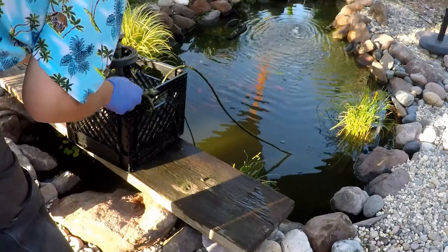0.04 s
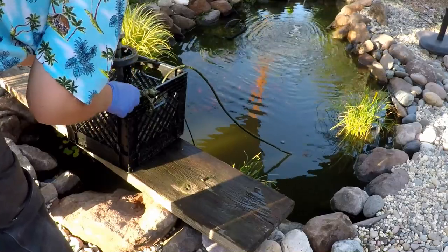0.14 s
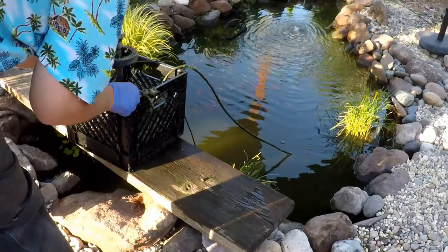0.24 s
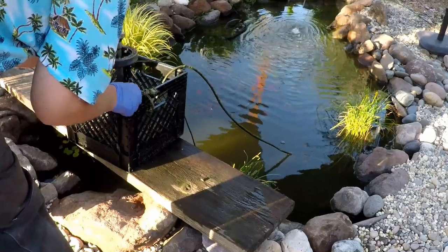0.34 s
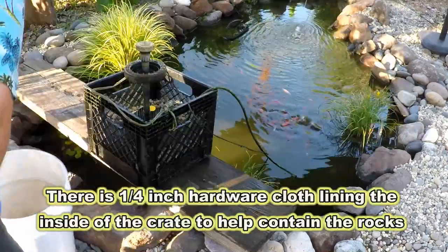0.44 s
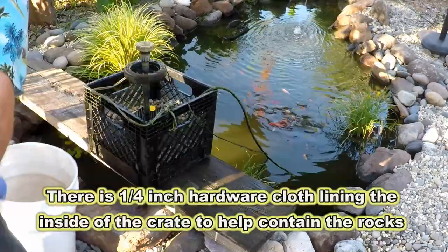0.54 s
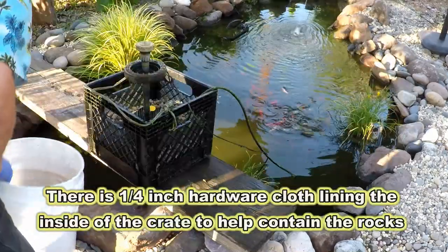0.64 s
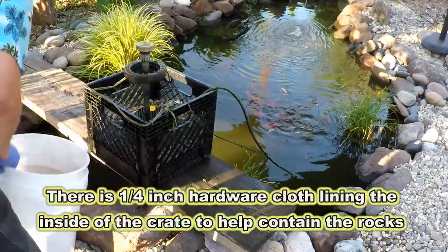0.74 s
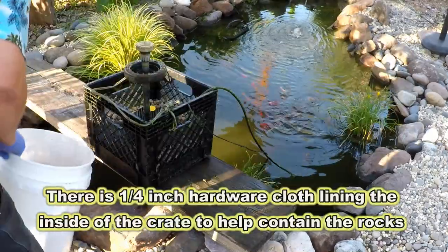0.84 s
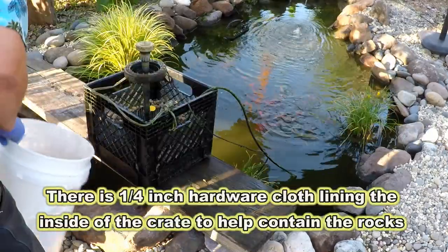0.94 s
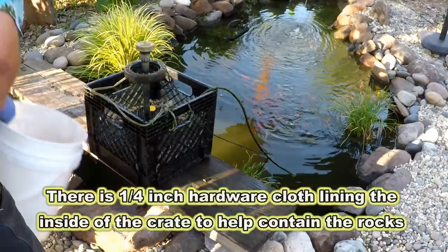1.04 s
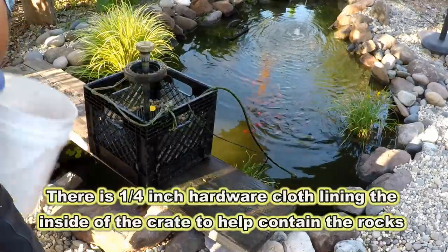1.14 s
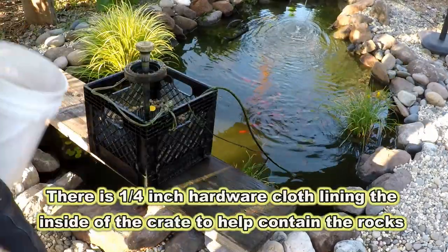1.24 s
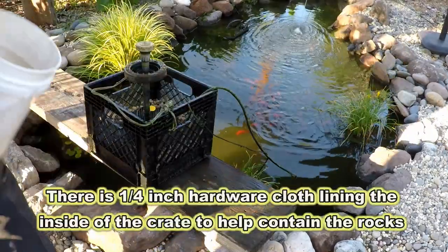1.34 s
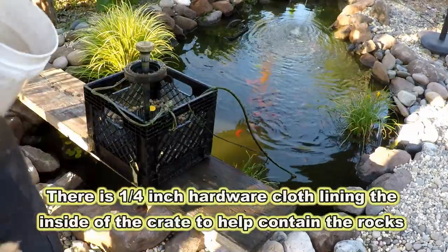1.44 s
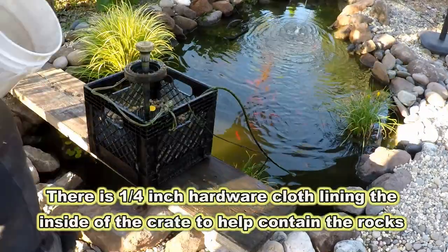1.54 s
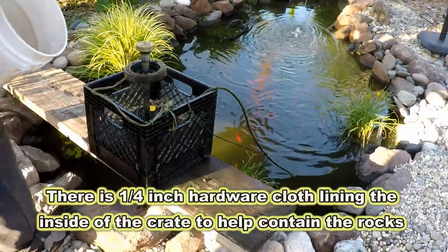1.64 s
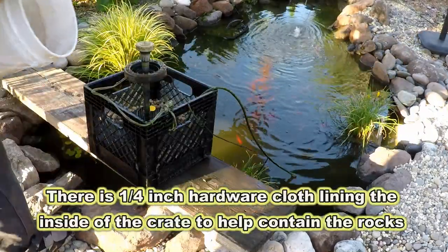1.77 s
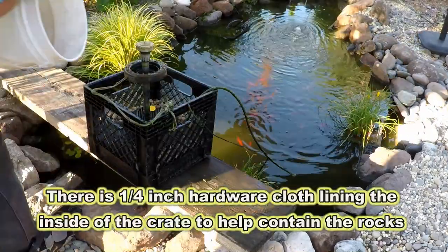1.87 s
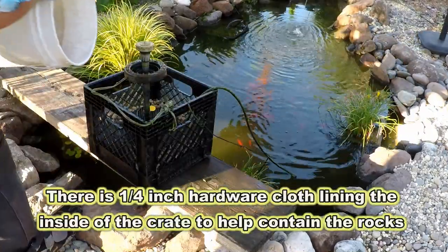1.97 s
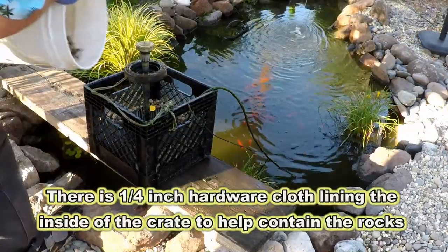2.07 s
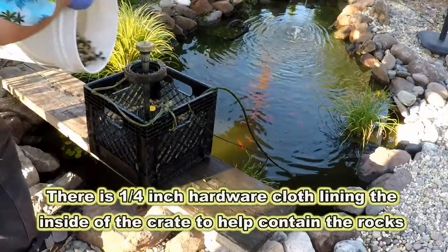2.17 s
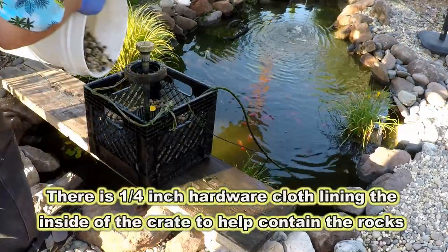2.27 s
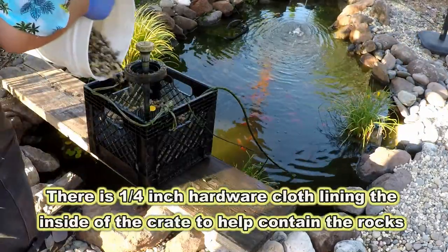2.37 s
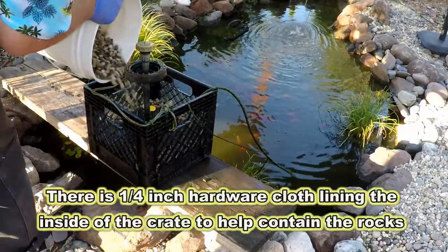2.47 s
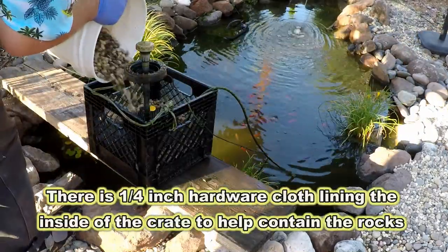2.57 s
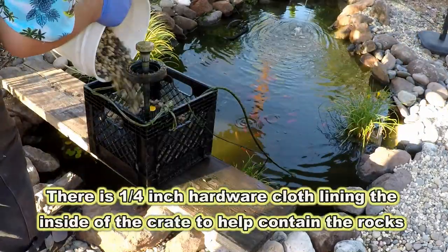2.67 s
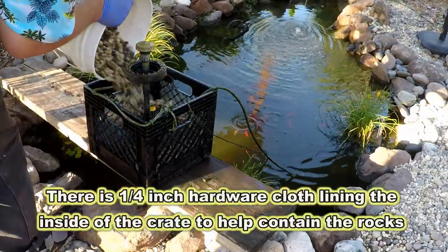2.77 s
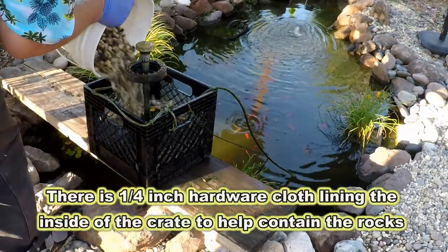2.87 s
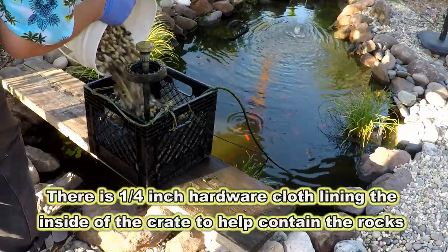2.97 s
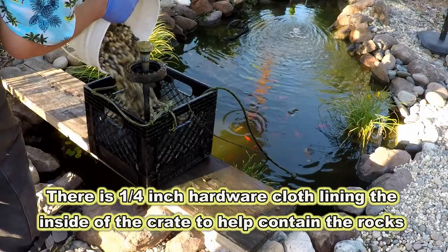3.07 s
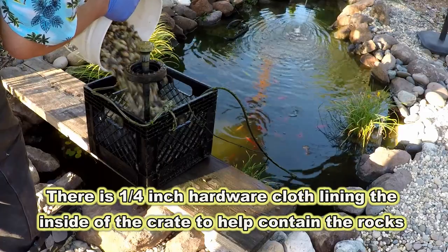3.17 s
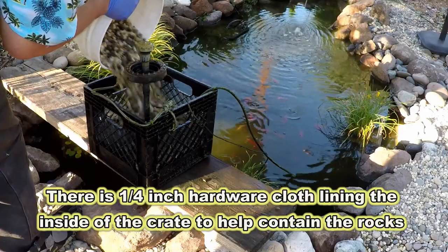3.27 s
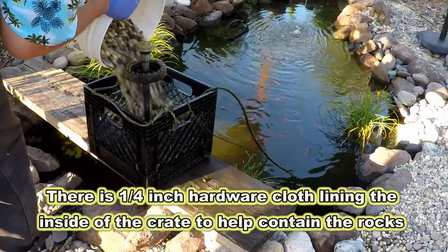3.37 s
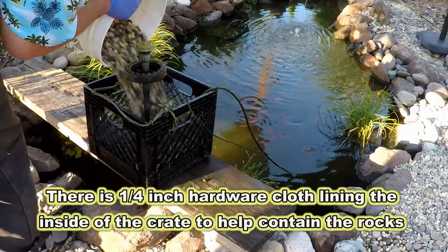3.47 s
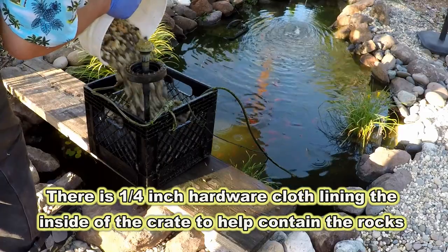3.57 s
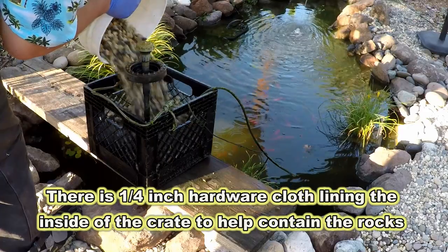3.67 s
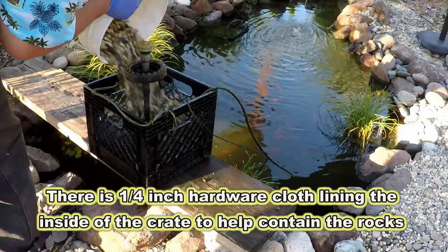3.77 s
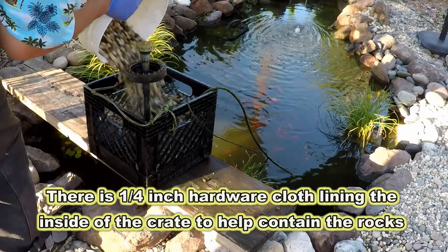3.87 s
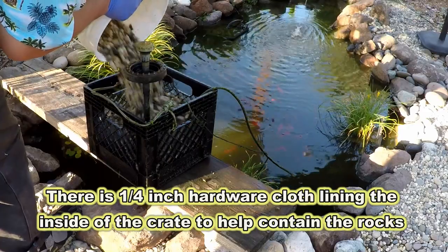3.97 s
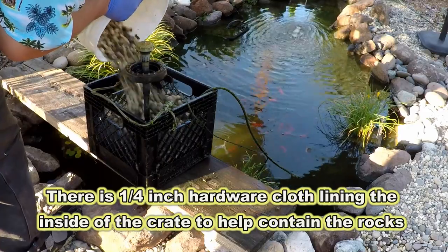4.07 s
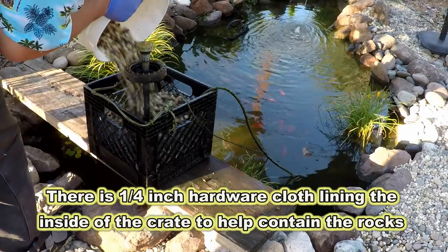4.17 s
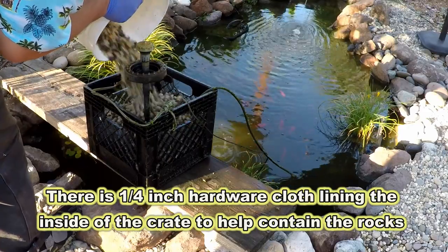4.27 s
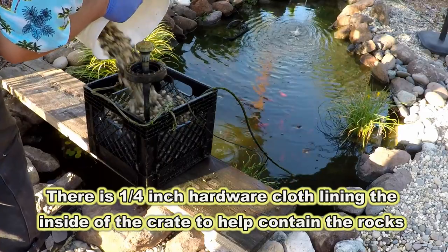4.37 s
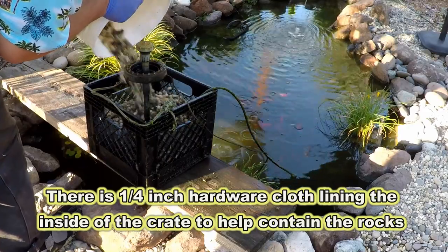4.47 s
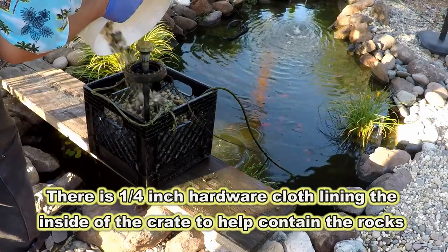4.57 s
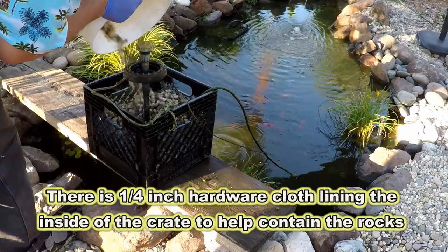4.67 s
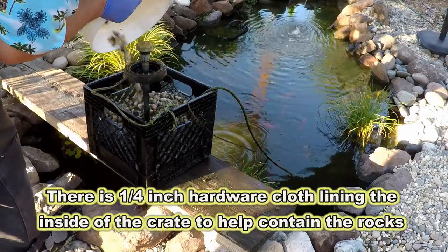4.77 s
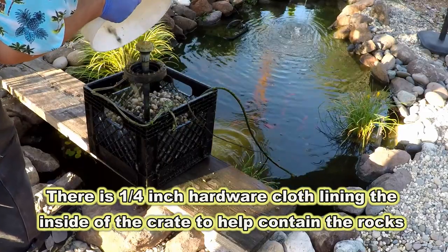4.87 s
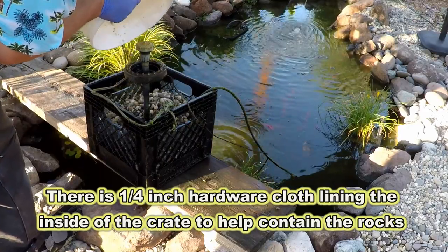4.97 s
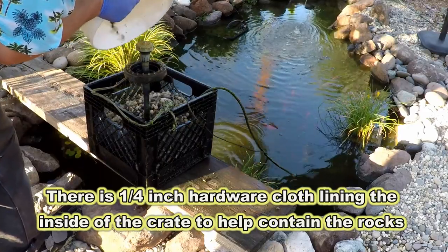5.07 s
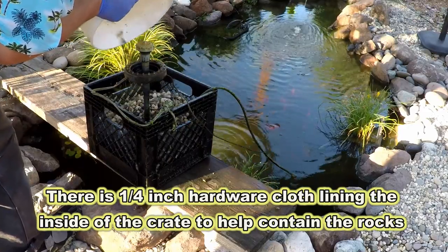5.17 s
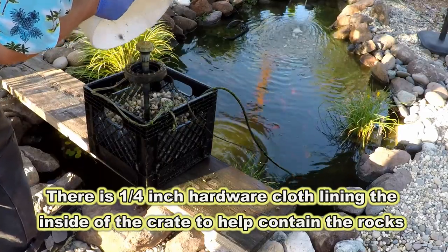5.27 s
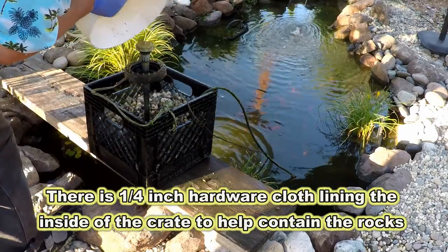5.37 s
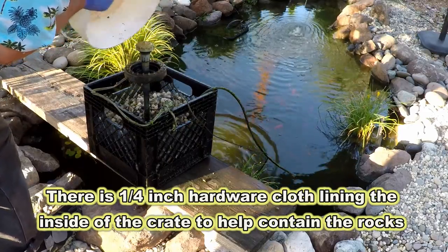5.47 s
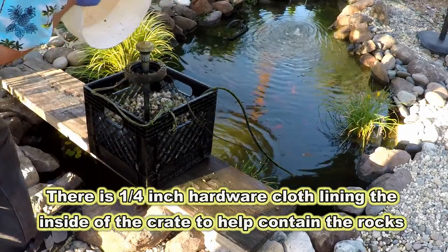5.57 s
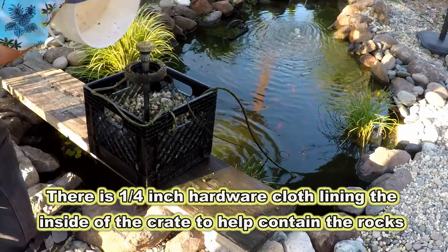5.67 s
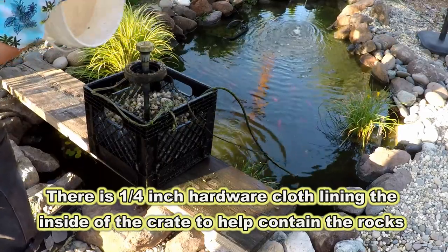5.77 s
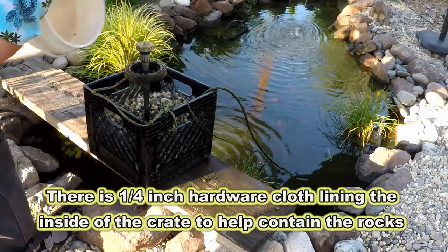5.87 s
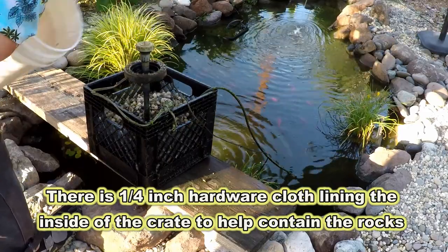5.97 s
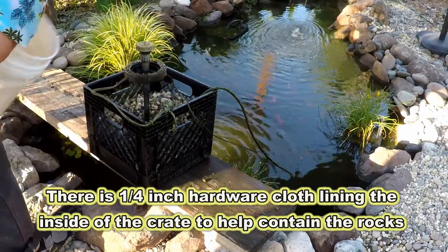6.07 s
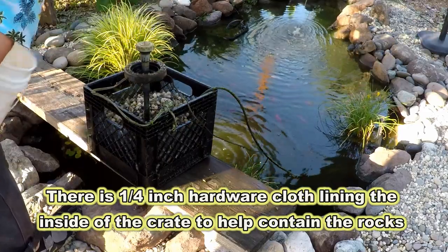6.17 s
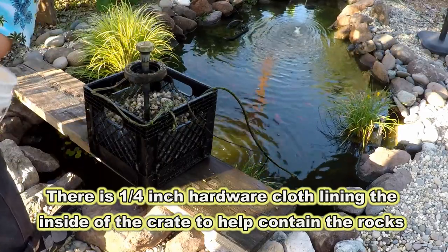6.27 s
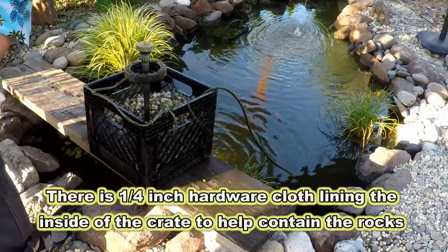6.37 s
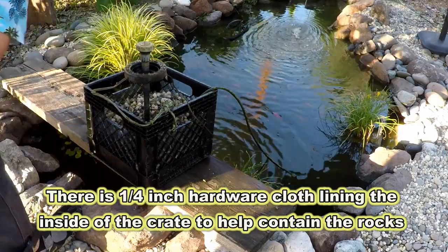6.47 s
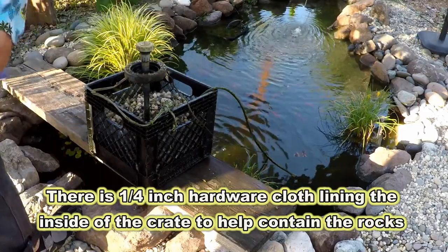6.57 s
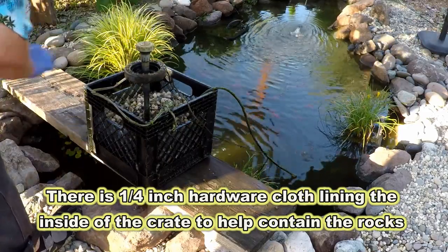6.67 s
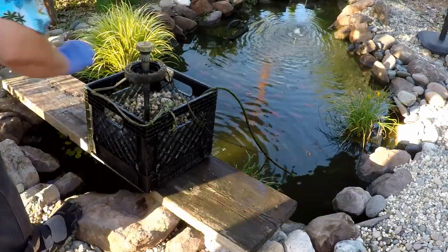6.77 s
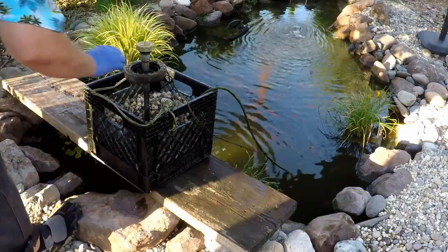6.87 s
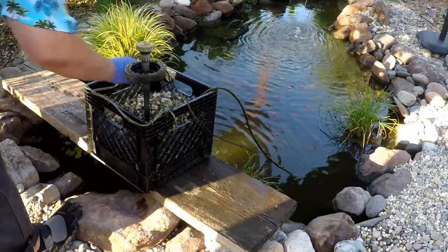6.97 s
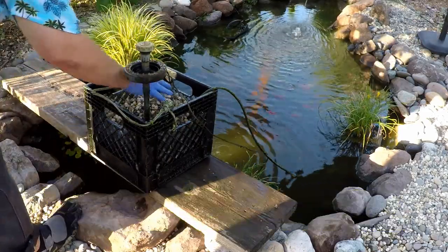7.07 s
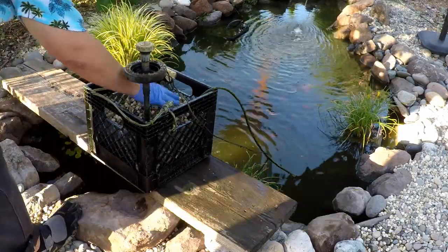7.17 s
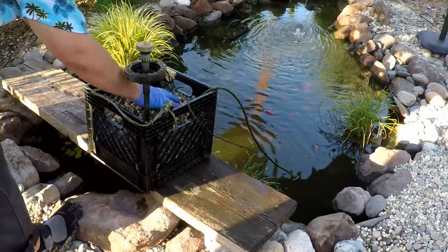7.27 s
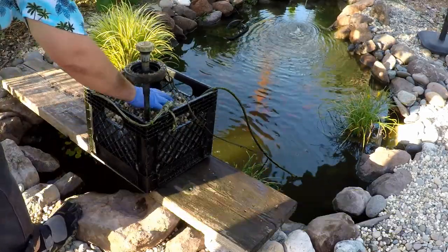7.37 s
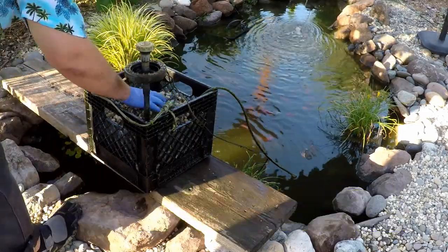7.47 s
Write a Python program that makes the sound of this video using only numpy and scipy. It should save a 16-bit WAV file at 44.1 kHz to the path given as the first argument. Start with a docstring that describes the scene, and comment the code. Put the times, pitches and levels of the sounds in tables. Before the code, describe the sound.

Outdoors at a garden pond, close and dry, nearly mono. For the first half second a gust rumbles low over soft hiss, with small watery bubbles and drips; then the air calms. Faint stone ticks lead to a sharp hollow knock at 0.8 s as gravel shifts in a plastic bucket, with smaller clacks until 1.45 s and more from 1.7 s. At about 2.0 s the load slides down the bucket wall in a loud, hollow rush, dips around 2.6 s with separate knocks, then pours into a crate: dense, bright rattling with clear stone clacks and crisp clicks, strong from 3 to 4.5 s. It thins from 4.6 s to scattered stones, nearly gone by 5.7 s. A hollow plastic bump lands at 6.3 s, a lighter one at 6.9 s, with small drips between. Soft, low wooden knocks sound from 7.0 to 7.4 s over quiet air.

```python
"""Gravel shifts in a plastic bucket, slides down its wall and pours into a crate beside a garden pond:
clouds of random impacts, rattling as noise, are coloured by bucket, crate and stone. Larger stones clack
as short sines and single stones knock as noise bursts; the bucket and, at the end, a wooden plank ring
in damped modes. A light wind rumbles as lumpy noise over a soft hiss; the pond bubbles in tiny sines.
The two channels are nearly alike."""
import sys
import numpy as np
from scipy import signal
from scipy.fft import rfft, irfft, next_fast_len
from scipy.io import wavfile
from scipy.ndimage import uniform_filter1d, map_coordinates

SR = 44100
rng = np.random.default_rng(int(sys.argv[2]) if len(sys.argv) > 2 else 0)


def linear_from_db(decibels):
    """Turn decibels (scalar or array-like) into linear amplitude factors; 0 gives 1."""
    return 10 ** (np.asarray(decibels, float) / 20)


def transcribe(u):
    """Save the signal u as a 16-bit wav file named by the first command-line argument.

    u: samples, shape (n,) or (channels, n), limited to [-1, 1]; the rate is SR.
    q: integer samples, one column per channel.
    """
    v = np.clip(np.atleast_2d(u).T, -1, 1)
    q = np.round(v * 32767).astype(np.int16)
    wavfile.write(sys.argv[1], SR, q)


N = 332073

# The moving gravel: (time [s], clatter [dB], hollow knocking over clatter [dB],
# stone-on-stone clicks over clatter [dB])
GRAVEL_FLOW = [(0, -62.5, -1, -6), (.65, -61, 1.5, -10.5), (1.0, -58.5, 2, -12.5), (1.7, -60, -5, -9),
               (1.8, -48, -5, -8.5), (1.96, -45.5, -1, -9.5), (1.99, -28, 0.5, -18), (2.1, -30, -1.5, -13),
               (2.44, -37, -0.5, -10), (2.64, -40.5, 4, -8.5), (2.8, -38.5, 4, -4.5), (3.05, -34, 2.5, -4),
               (3.6, -33.5, 1.5, 0), (4.21, -32, -2.5, -2.5), (4.5, -34.5, -2.5, -0.5),
               (4.75, -38.5, -3, -1), (4.95, -43, 0.5, -0.5), (5.1, -46.5, -2.5, 1),
               (5.25, -53.5, -0.5, -0.5), (5.55, -61, 5, 2), (5.72, -66, 1.5, -0.5), (6.1, -70, -6, -8),
               (6.5, -61.5, -0.5, -12.5), (6.75, -69.5, -3, -6.5), (7.05, -69, 7, -12),
               (7.35, -68.5, 0, -5.5), (7.53, -49, -8, -6.5)]
# How the sound passes from bucket to crate: (time [s], share given to the crate [0-1])
CRATE_SHARE = [(0, 0.07), (2.45, 0), (2.75, 0.84), (4.6, 0.8), (5.2, 0.4), (7.53, 0.13)]
# Stones on mesh and heap: (frequency [Hz], relative density [dB per Hz])
CRATE_CLATTER = [(1350, -29.5), (2300, -11.5), (3390, 2.5), (4340, 1), (6790, -8.5), (8500, -24.5),
                 (11000, -39), (18700, -120)]
# Low knocking in the crate: (frequency [Hz], relative density [dB per Hz])
CRATE_HOLLOW = [(350, -39), (600, -21), (727, -13), (927, -6), (1080, -13), (1420, -3), (1900, -1),
                (2400, -0.5), (3120, -5), (5280, -120)]
# Drumming in the crate: (frequency [Hz], relative density [dB per Hz])
CRATE_DRUM = [(88, -41), (150, -27), (231, -5.5), (446, -0.5), (517, 1), (700, 0), (910, -22), (1540, -120)]
# The loaded bucket, drumming lower: (frequency [Hz], relative density [dB per Hz])
BUCKET_DRUM = [(88, -36), (150, -13), (215, 0), (330, -6), (517, -3.5), (700, -2), (910, -20), (1540, -120)]
# Bucket wall and cavity, lower ridge: (frequency [Hz], relative density [dB per Hz])
WALL_LOW = [(350, -39.5), (600, -4), (722, -11.5), (901, -2), (1080, -2), (1280, 1), (1480, 3), (1820, 0),
            (2010, -0.5), (2400, -6.5), (3120, -38), (5280, -120)]
# Bucket wall, upper ridge: (frequency [Hz], relative density [dB per Hz])
WALL_HIGH = [(1350, -38.5), (2300, -5), (2680, -3.5), (3110, 0.5), (3910, -9), (7020, -19), (8500, -26),
             (11000, -44), (18700, -120)]
# Stone clicking on stone: (frequency [Hz], relative density [dB per Hz])
STONE_CLICKS = [(4120, -36.5), (7000, -7), (8480, -14.5), (10500, -2), (11700, -1.5), (13200, -4),
                (14700, -10), (15400, -12.5)]
# Large stones that ring clearly: (time [s], level [dB], frequency [Hz])
RINGING_STONES = [(2.829, -14, 1460), (3.003, -16, 1500), (3.152, -15, 1440), (4.539, -23, 1000),
                  (4.54, -18, 2020)]

# Wind at the microphone: (time [s], rumble level [dB])
WIND_LEVEL = [(0, -46.5), (.42, -44), (.52, -54), (4.3, -54.5), (6, -55.5), (7.53, -54.5)]
# Colour of the wind: (frequency [Hz], relative density [dB per Hz])
WIND_RUMBLE = [(12, -32), (20, -2.5), (65, -2), (97, -6), (152, -15), (184, -26), (250, -21), (320, -27),
               (550, -120)]
# Colour of the distant garden hiss: (frequency [Hz], relative density [dB per Hz])
GARDEN_HISS = [(88, -38), (150, 1.5), (582, -2.5), (1170, -7), (2050, -54), (3330, -22.5), (4460, -19.5),
               (4910, -14), (8780, -29), (12900, -37), (15400, -40)]
# Faint bubbling of the pond: (time [s], level [dB])
POND_LEVEL = [(0, -55), (.45, -74), (.55, -75), (5.6, -66.5), (7.53, -71.5)]
# Nearer drips: (time [s], level [dB], frequency [Hz])
NEAR_DRIPS = [(0.0185, -37, 2290), (0.0608, -37.5, 3480), (0.0982, -43, 2180), (0.288, -38, 2970),
              (0.3735, -40.5, 3620), (0.7088, -52, 3450), (5.8366, -53, 1550), (6.183, -56, 2510),
              (6.1994, -45, 3210), (6.268, -45, 3220), (6.6184, -41, 3560), (7.1777, -45, 1760),
              (7.228, -42.5, 1670)]

# Single stones and small handfuls landing:
# (time [s], level [dB], hollowness [dB], nominal 60 dB decay [s])
STONE_KNOCKS = [(0.236, -36.5, -4.5, 0.071), (0.409, -39, -1.5, 0.14), (0.465, -39.5, 6.5, 0.055),
                (0.505, -37, 0, 0.068), (0.561, -39.5, 2.5, 0.065), (0.619, -36.5, -3, 0.063),
                (0.655, -34, -7.5, 0.016), (0.754, -28, 3, 0.031), (0.793, -17, 2.5, 0.036),
                (0.799, -8, 1.5, 0.027), (0.82, -24.5, 2, 0.07), (0.863, -37.5, 6, 0.057),
                (0.935, -21, 2, 0.036), (0.953, -25.5, 1.5, 0.031), (0.989, -23, 6.5, 0.019),
                (1.032, -34, 4, 0.045), (1.074, -24, 0.5, 0.025), (1.155, -34, 3, 0.028),
                (1.166, -30.5, -4, 0.032), (1.175, -31, 2.5, 0.058), (1.196, -39, -5, 0.031),
                (1.249, -48, 8, 0.036), (1.366, -31.5, 4.5, 0.045), (1.38, -30, 6, 0.035),
                (1.39, -33.5, 0, 0.031), (1.429, -21.5, 2.5, 0.022), (1.517, -37, 1, 0.038),
                (1.721, -16.5, 0.5, 0.026), (1.774, -31.5, 1, 0.068), (1.79, -23.5, -1, 0.082),
                (1.853, -15.5, 2.5, 0.02), (1.872, -23, 5, 0.018), (1.9, -18, 1, 0.035),
                (1.932, -20.5, 0.5, 0.061), (1.956, -22, 3.5, 0.045), (1.983, -21, -4, 0.025),
                (2.52, -17, 2, 0.045), (2.545, -16, -2, 0.035), (2.552, -28, 0, 0.029),
                (2.565, -17.5, 1.5, 0.031), (2.598, -27, -4, 0.039), (2.627, -24, 0, 0.025),
                (2.647, -15, -0.5, 0.059), (2.679, -18.5, 1, 0.049), (2.721, -17.5, 2.5, 0.069),
                (2.754, -16.5, 1.5, 0.053), (2.823, -18.5, 0, 0.029), (2.829, -14.5, 0.5, 0.042),
                (2.853, -19, 0, 0.038), (2.884, -14.5, 2, 0.054), (2.944, -20, 0, 0.037),
                (3.0, -18.5, 0, 0.04), (4.539, -16.5, 4, 0.015), (4.86, -27, -8, 0.03),
                (4.935, -27, -4, 0.038), (4.99, -36, -3, 0.045), (5.048, -29, -5.5, 0.043),
                (5.113, -29.5, 3, 0.033), (5.166, -29, 0, 0.14), (5.198, -27.5, 0, 0.094),
                (5.246, -30, -0.5, 0.052), (5.282, -32, 3, 0.067), (5.29, -26, -1, 0.06),
                (5.336, -31.5, 3.5, 0.045), (5.369, -31, -5, 0.04), (5.403, -34, -2.5, 0.071),
                (5.439, -25.5, -3.5, 0.022), (5.454, -35, -5, 0.048), (5.475, -23.5, -0.5, 0.061),
                (5.494, -26.5, 2, 0.14), (5.537, -39, -3, 0.036), (5.591, -34.5, -1, 0.063),
                (5.614, -31, 3.5, 0.057), (5.734, -46, -3.5, 0.05), (5.918, -44.5, -3, 0.06),
                (5.952, -36, 0.5, 0.028)]
# Bumps and scuffs of the empty bucket and the plank:
# (time [s], level [dB], hollowness [dB], nominal 60 dB decay [s])
BUMPS = [(6.324, -17, 0, 0.061), (6.344, -22, 3, 0.078), (6.407, -47, -2, 0.045),
         (6.467, -39.5, -2.5, 0.092), (6.533, -41.5, 4, 0.04), (6.668, -45, 6, 0.036),
         (6.734, -36, 2.5, 0.069), (6.889, -28.5, 2.5, 0.062), (6.958, -34.5, 3.5, 0.14),
         (7.046, -37.5, 2.5, 0.058), (7.062, -39.5, 8.5, 0.042), (7.177, -47.5, 13, 0.05),
         (7.254, -49, 6, 0.05), (7.291, -50.5, 9, 0.06), (7.333, -45, 2.5, 0.082)]
# Parts of a stone knock over its level: (drumming [dB], hollow [dB], clatter [dB], click [dB])
STONE_PARTS = [-36, -15, -15.5, -22]
# Parts of a bump over its level: (drumming [dB], hollow [dB], clatter [dB], click [dB])
BUMP_PARTS = [-22.5, -14.5, -15.5, -22.5]
# The emptying bucket is struck by its last stones, then touches the ground: (time [s], level [dB])
BUCKET_TOUCHES = [(4.62, -42.5), (4.801, -51), (5.01, -49), (5.04, -48.5), (5.335, -48.5), (6.325, -33),
                  (6.397, -63), (6.534, -54), (6.597, -61), (6.736, -52), (6.891, -41.5)]
# Modes of the bucket: (frequency [Hz], level over the touch [dB], 60 dB decay [s])
BUCKET_MODES = [(484, 1.5, .12), (803, -7.5, 0.16), (1050, 2, 0.08), (1350, -2, 0.084), (2180, -14, .04)]
# Blows on the plank: (time [s], level [dB], lowest mode [Hz], hardness [dB gained per octave])
PLANK_BLOWS = [(6.976, -25.5, 174.6, -0.5), (7.027, -30, 200.5, -7), (7.196, -41, 219, -6),
               (7.254, -27, 187.7, -0.5), (7.289, -35.5, 172, 2), (7.32, -33.5, 206, -8),
               (7.376, -40, 204, -16)]
# Modes of the plank: (multiple of lowest mode, level over the blow [dB], 60 dB decay [s])
PLANK_MODES = [(1, 0.5, 0.18), (1.72, 3.5, 0.062), (2.1, -2, 0.085), (4.1, -10.5, .06), (5.8, -10, 0.041)]

# Drumming over the hollow knocking [dB], and its rise as stones click [dB per dB]
DRUM_DB, DRUM_WITH_CLICKS = -16.5, 0.31
# A full stream is even; a thinner one lets single sizes show: full flow, thinning scale, widening [dB]
FULL_DB, THINNING_DB, SPREAD_DB = -34.5, 8.5, 8
# Larger stones in the stream: level over the hollow knocking [dB], base pitch [Hz], life [cycles]
CLACK_DB, CLACK_HZ, CLACK_CYCLES = -7, 1550, 12
# Hiss in the calmest air [dB], and its rise with the wind [dB per dB]
HISS_DB, HISS_FOLLOWS = -62.5, 0.81
CLICK_FOLLOWS = 0.95  # a stone clicks as brightly as the heap it lands on [dB per dB]
TOP_HZ = 15500  # upper band limit


def unit(x):
    """Scale a signal to rms 1."""
    return x / np.sqrt(np.mean(x ** 2) + 1e-20)


def curves(rows):
    """Draw straight lines through the rows: one curve for each column after the time."""
    times, *columns = np.transpose(rows)
    return [np.interp(np.arange(N) / SR, times, column) for column in columns]


def wobble(rate):
    """A smooth random curve with rate knots a second."""
    knots = rng.standard_normal(int(N * rate / SR) + 4)
    return map_coordinates(knots, [np.arange(N) * rate / SR])


def response(spectrum, size=8192):
    """Causal impulse response of energy 1, its energy gathered early (minimum phase)."""
    hz, db = np.transpose(spectrum)
    grid = np.fft.rfftfreq(size, 1 / SR)
    gain = linear_from_db(np.interp(np.log(grid + 1), np.log(hz), db))
    cepstrum = irfft(np.log(gain + 1e-6))
    folded = np.r_[cepstrum[0], 2 * cepstrum[1:size // 2], np.zeros(size // 2)]
    pulse = irfft(np.exp(rfft(folded)))[:size // 2]
    return pulse / np.linalg.norm(pulse)


def coloured(x, spectrum):
    """Sound x through a body of that colour."""
    return signal.fftconvolve(x, response(spectrum))[:N]


def rattle(impacts, t60):
    """Each impact rattles briefly: fresh noise under the decaying energy of all impacts so far."""
    keep = linear_from_db(-120 / (t60 * SR))  # energy kept per sample
    energy = signal.lfilter([1 - keep], [1, -keep], impacts ** 2)
    return np.sqrt(energy) * rng.standard_normal(N)


def ring(strikes):
    """Damped sines from rows of (time [s], level [dB], frequency [Hz], t60 [s]), softly started."""
    out = np.zeros(N + SR)
    t = np.arange(SR // 2) / SR
    for s, db, hz, t60 in strikes:
        tone = np.sin(2 * np.pi * hz * t) * (1 - np.exp(-t / 0.0031))
        out[round(s * SR):][:len(t)] += linear_from_db(db - 60 * t / t60) * tone
    return out[:N]


def strewn(grains):
    """Drop the grains at random moments and scale their sum to rms 1."""
    start = (rng.random(len(grains)) * N).astype(int)
    where = start[:, None] + np.arange(grains.shape[1])
    return unit(np.bincount(where.ravel(), grains.ravel(), N)[:N])


def gravel(per_second=1500):
    """Many impacts of log-normal size, arriving in clumps, excite plastic and stone alike."""
    flow_db, hollow_db, click_db = curves(GRAVEL_FLOW)
    drum_db = hollow_db + DRUM_DB + DRUM_WITH_CLICKS * click_db
    levels_db = flow_db + np.array([drum_db, hollow_db, 0 * flow_db, click_db])
    widening_db = SPREAD_DB * (1 - np.exp((flow_db - FULL_DB) / THINNING_DB))
    spread_db = np.clip(widening_db + 1.0, 0, 11)
    sigma = spread_db * np.log(10) / 20
    lands = (rng.random(N) < per_second / SR) * np.sqrt(SR / per_second)
    impacts = lands * np.exp(sigma * rng.standard_normal(N) - sigma ** 2)
    impacts = impacts * linear_from_db(spread_db * (0.067 * wobble(35) + 0.31 * wobble(11)))  # clumps
    lives = [0.04, 0.068, 0.05, 0.048]  # t60 [s] of drum, hollow, clatter, click
    return np.array([linear_from_db(db) * rattle(impacts, t60) for db, t60 in zip(levels_db, lives)])


def bodies(drum, hollow, clatter, click):
    """The four drives sound through bucket and crate, shared as the gravel slides or falls."""
    share = np.clip(curves(CRATE_SHARE)[0], 0, 1)
    to_crate, to_bucket = share ** .5, (1 - share) ** .5
    crate = coloured(hollow, CRATE_HOLLOW) + coloured(clatter, CRATE_CLATTER) + coloured(drum, CRATE_DRUM)
    wall = coloured(hollow, WALL_LOW) + coloured(clatter, WALL_HIGH)
    wall = wall * (1 - to_crate / 2)
    loaded = coloured(drum, BUCKET_DRUM)
    return to_crate * crate + to_bucket * (wall + loaded) + coloured(click, STONE_CLICKS)


def clacks(per_second=320):
    """Larger stones strike the wall or each other and ring for a few cycles, each at its own pitch."""
    count = int(per_second * N / SR)
    pitch, size = rng.standard_normal(count), rng.exponential(size=count)
    t = np.arange(SR // 60) / SR
    hz = CLACK_HZ * np.exp(.14 * pitch + .7 * (pitch > .6))  # about one in four is a smaller stone
    cycles = hz[:, None] * t
    envelope = (1 - np.exp(-cycles)) * np.exp(-3 * cycles / CLACK_CYCLES)
    rings = linear_from_db(3.5 * np.minimum(size, 3.5)[:, None]) * envelope * np.sin(2 * np.pi * cycles)
    flow_db, hollow_db, _ = curves(GRAVEL_FLOW)
    stream = linear_from_db(flow_db + hollow_db + CLACK_DB) * strewn(rings)
    return stream + ring([(s, db, hz, .03) for s, db, hz in RINGING_STONES])


def air():
    """Wind rumbles in lumps at the microphone over the far garden hiss, which rises in a gust."""
    wind_db, = curves(WIND_LEVEL)
    lumps = linear_from_db(1.47 * wobble(7.8) + 0.5 * wobble(3.16))
    rumble = unit(lumps * coloured(rng.standard_normal(N), WIND_RUMBLE))
    hiss_db = HISS_DB + 2.4 * wobble(5.3) + HISS_FOLLOWS * (wind_db - wind_db.min())
    hiss = linear_from_db(hiss_db) * coloured(rng.standard_normal(N), GARDEN_HISS)
    return linear_from_db(wind_db) * rumble + hiss


def pond(per_second=300):
    """Small bubbles burst at random, short sines that rise a little; nearer drips ring at fixed pitch."""
    count = int(per_second * N / SR)
    pitch, size = rng.standard_normal(count), rng.exponential(size=count)
    t = np.arange(SR // 40) / SR
    cycles = 2900 * np.exp(.35 * pitch)[:, None] * t
    rising = np.sin(2 * np.pi * cycles * (1 + .0015 * cycles))
    bubbles = linear_from_db(2.5 * np.minimum(size, 3.5)[:, None]) * rising * cycles * np.exp(-cycles / 2.5)
    far = linear_from_db(curves(POND_LEVEL)[0]) * strewn(bubbles)
    return far + ring([(s, db, hz, .035) for s, db, hz in NEAR_DRIPS])


def knocks(rows, parts_db):
    """A contact has a sharp edge and skitters to rest: an uneven noise burst with a faint tail."""
    t = np.arange(SR // 5) / SR
    drives = np.zeros((4, N + len(t)))  # drum, hollow, clatter, click
    haste = np.array([[.8], [.95], [1.05], [1.3]])  # treble dies first
    heap_click_db = curves(GRAVEL_FLOW)[-1]
    for s, db, hollow_db, t60 in rows:
        start = round(s * SR)
        noise = rng.standard_normal((5, len(t)))
        skitter = linear_from_db(1.57 * unit(uniform_filter1d(noise[-1], size=90)))
        fall_db = -60 * haste * t / np.clip(t60, .01, .3)
        envelope = linear_from_db(fall_db) + linear_from_db(fall_db / 3.34 - 9.5)  # sharp edge, faint tail
        click_db = CLICK_FOLLOWS * heap_click_db[start] - hollow_db
        lean_db = [0, hollow_db, -hollow_db, click_db]
        burst = linear_from_db(db + np.add(parts_db, lean_db))[:, None] * envelope
        drives[:, start:start + len(t)] += burst * skitter * noise[:-1]
    return drives[:, :N]


def bucket():
    """The plastic modes ring at new strengths with each touch."""
    return ring([(s, db + level + rng.normal(0, 2.6), hz, t60)
                 for s, db in BUCKET_TOUCHES for hz, level, t60 in BUCKET_MODES])


def plank():
    """Soft blows set the low modes of the wood ringing; harder ones reach the higher modes."""
    return ring([(s, db + level + hardness * np.log2(multiple), multiple * hz, t60)
                 for s, db, hz, hardness in PLANK_BLOWS for multiple, level, t60 in PLANK_MODES])


def scene():
    """Both channels hear almost the same; a faint scattered copy tells them apart."""
    drives = gravel() + knocks(STONE_KNOCKS, STONE_PARTS) + knocks(BUMPS, BUMP_PARTS)
    mid = bodies(*drives) + clacks() + air() + pond() + bucket() + plank()
    t = np.arange(SR // 50) / SR
    scatter = rng.standard_normal(len(t)) * linear_from_db(-60 * t / 0.1)
    scattered = signal.fftconvolve(mid, scatter / np.linalg.norm(scatter))[:N]
    side = linear_from_db(-41.5) * scattered - 0.018 * mid  # the second channel is a touch louder
    return np.array([mid + side, mid - side])


def roll_off(x):
    """The treble ends steeply here."""
    return signal.sosfilt(signal.butter(12, 16460, fs=SR, output="sos"), x)


def record(dry):
    """Nothing is kept above the band limit."""
    size = next_fast_len(N)
    in_band = np.fft.rfftfreq(size, 1 / SR) < TOP_HZ
    mix = irfft(rfft(dry, size) * in_band, size)[:, :N]
    return roll_off(mix)


dry = scene()
out = record(dry)
transcribe(out)
```